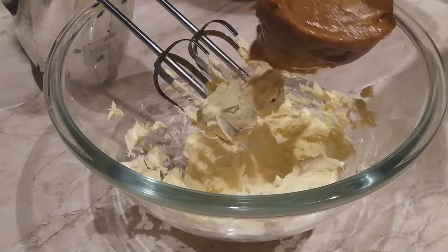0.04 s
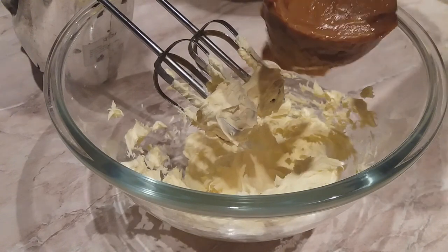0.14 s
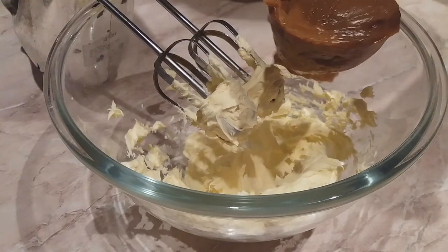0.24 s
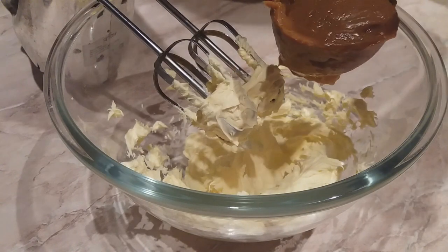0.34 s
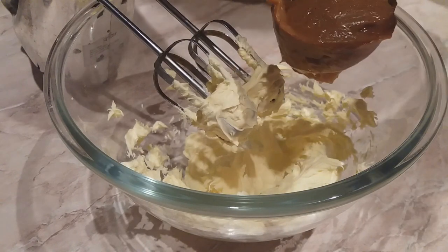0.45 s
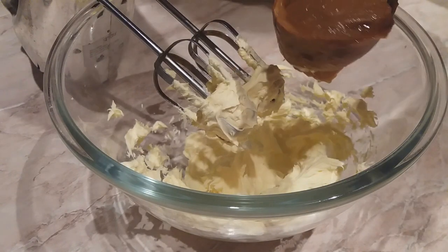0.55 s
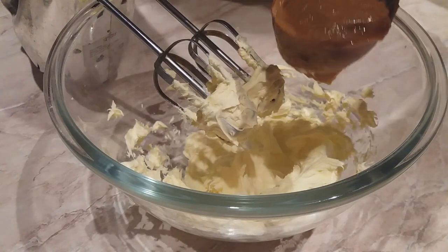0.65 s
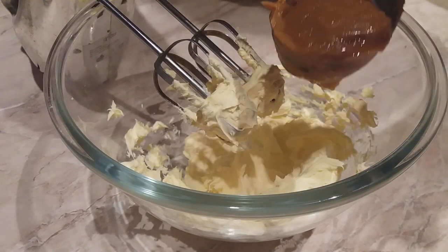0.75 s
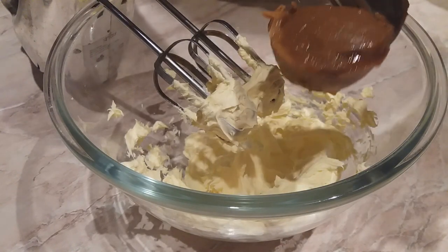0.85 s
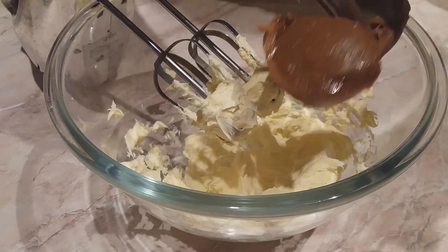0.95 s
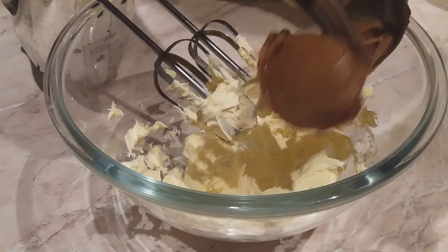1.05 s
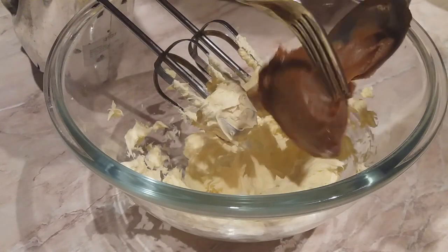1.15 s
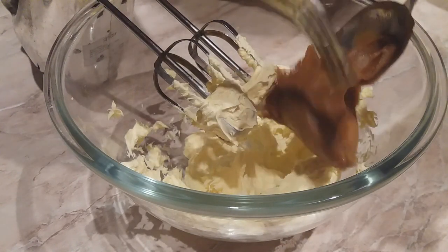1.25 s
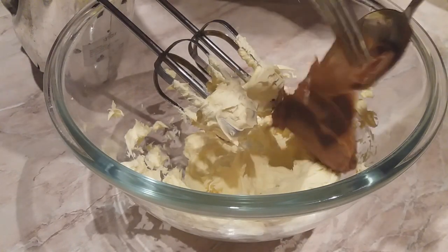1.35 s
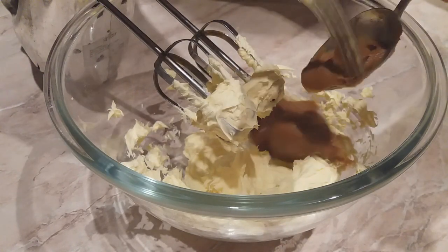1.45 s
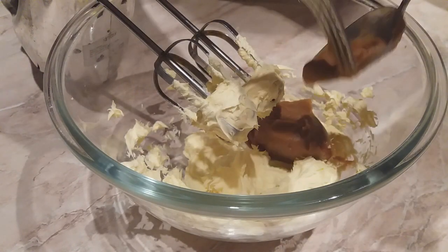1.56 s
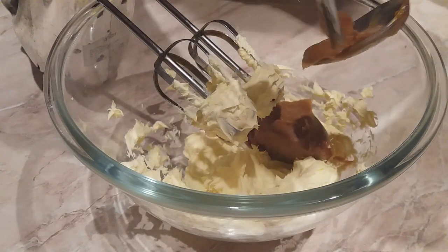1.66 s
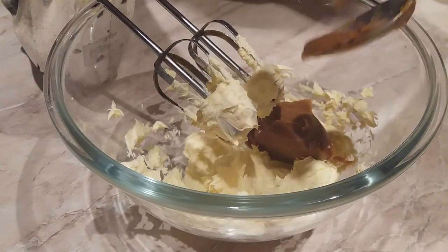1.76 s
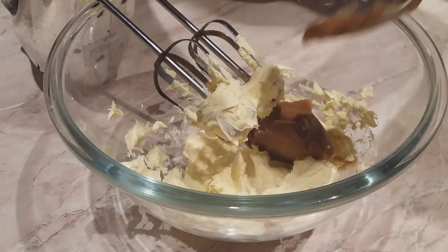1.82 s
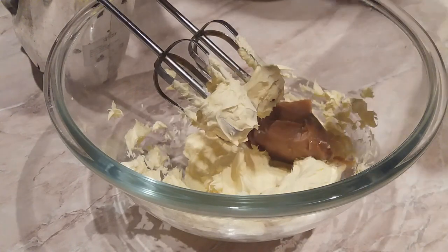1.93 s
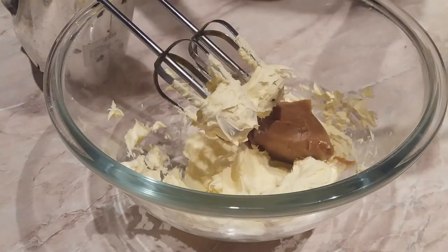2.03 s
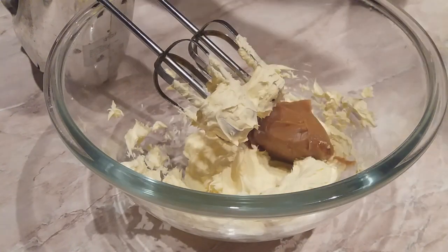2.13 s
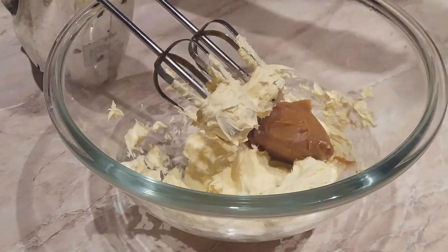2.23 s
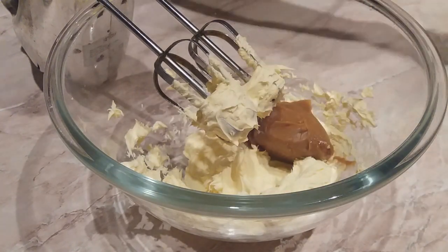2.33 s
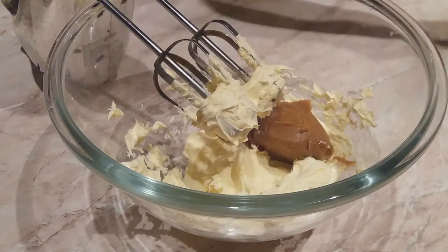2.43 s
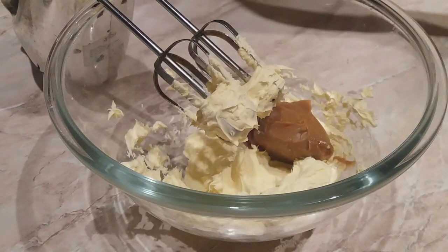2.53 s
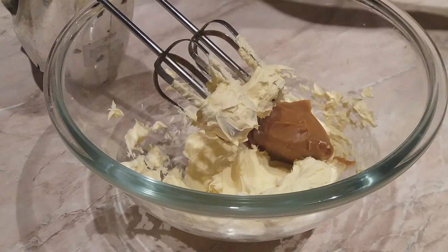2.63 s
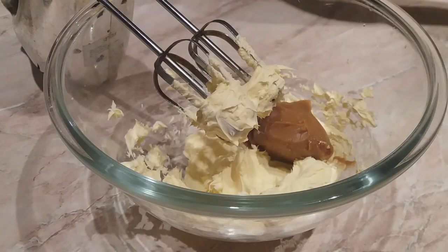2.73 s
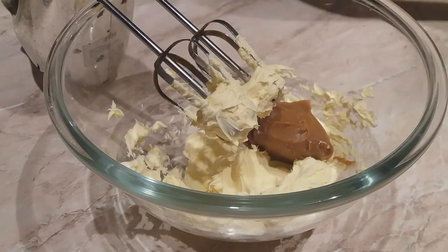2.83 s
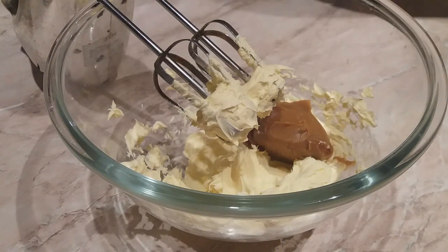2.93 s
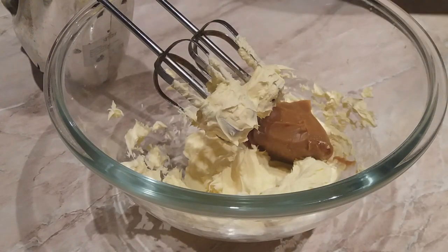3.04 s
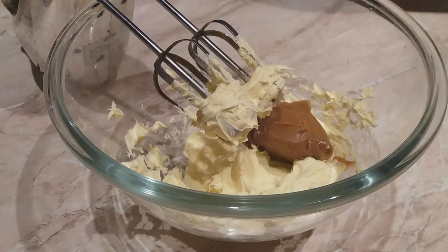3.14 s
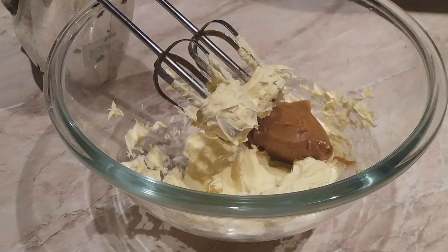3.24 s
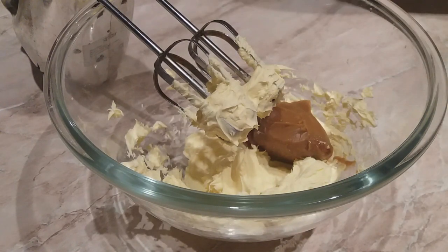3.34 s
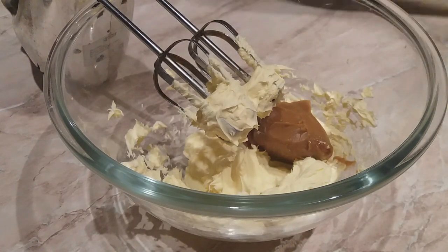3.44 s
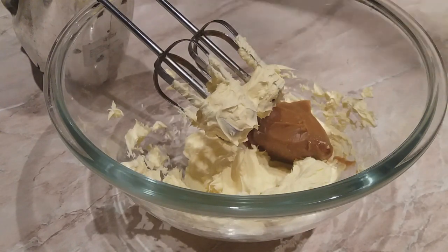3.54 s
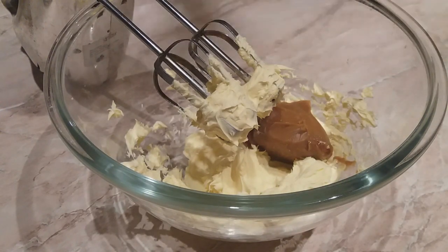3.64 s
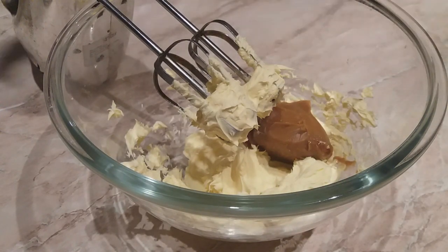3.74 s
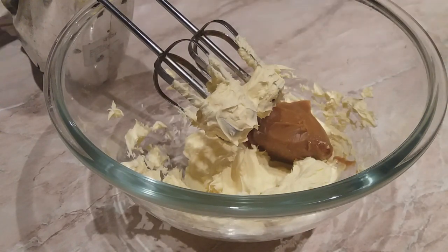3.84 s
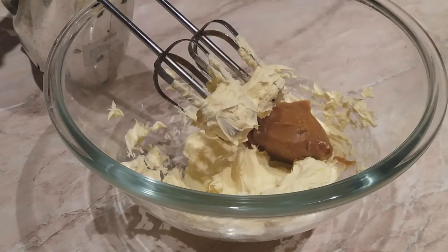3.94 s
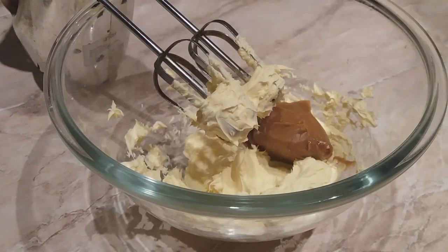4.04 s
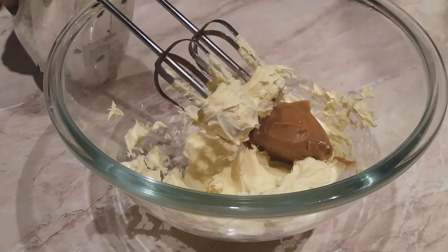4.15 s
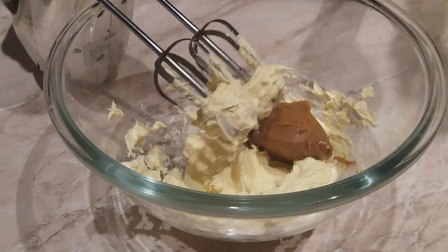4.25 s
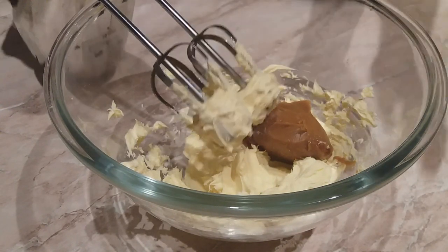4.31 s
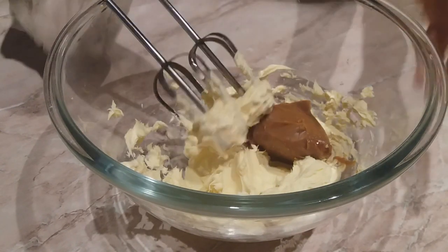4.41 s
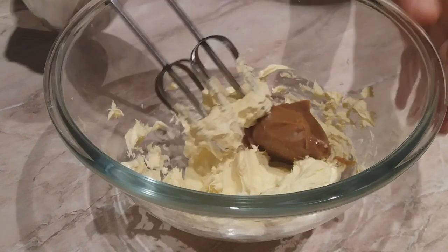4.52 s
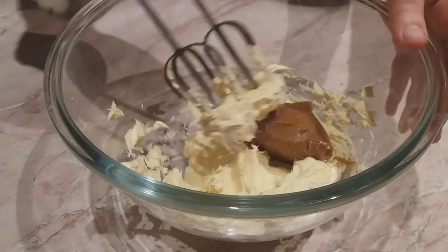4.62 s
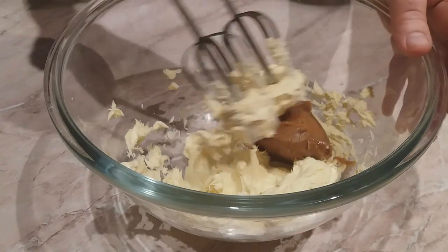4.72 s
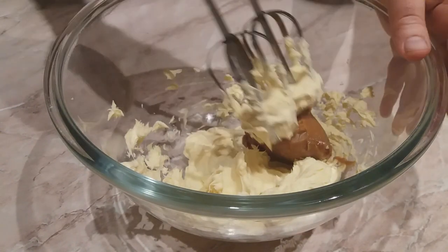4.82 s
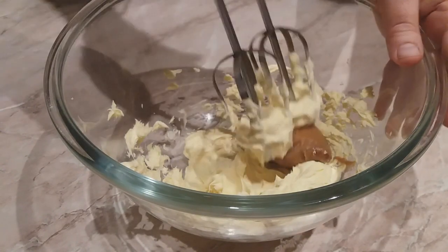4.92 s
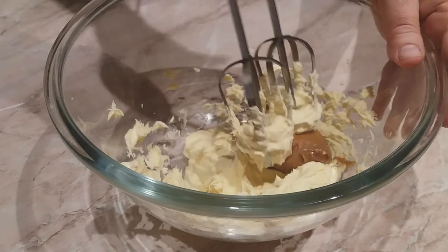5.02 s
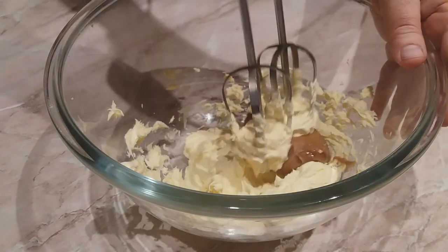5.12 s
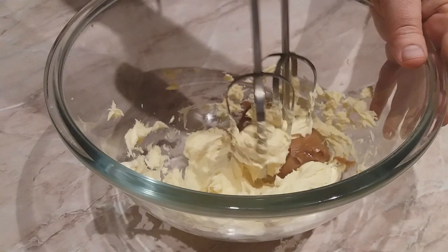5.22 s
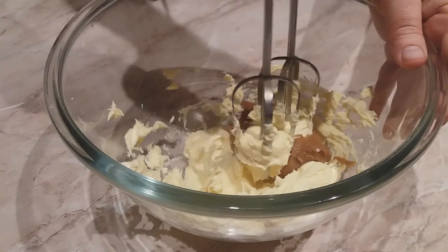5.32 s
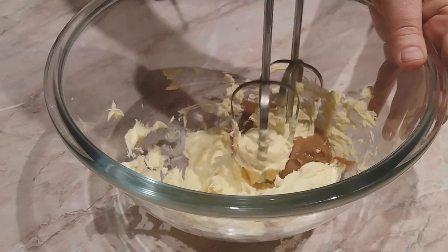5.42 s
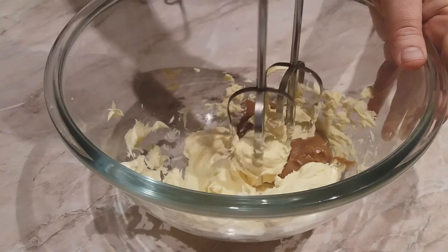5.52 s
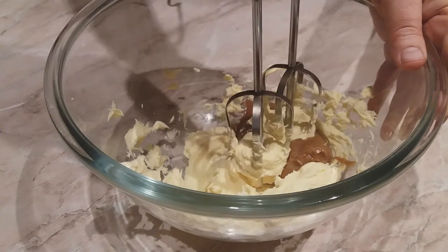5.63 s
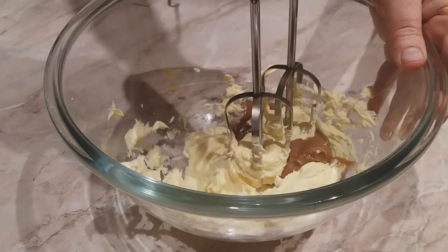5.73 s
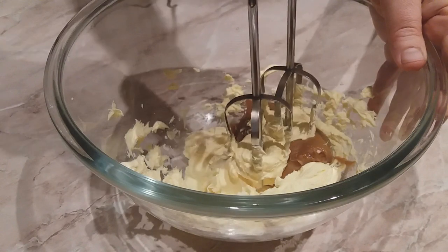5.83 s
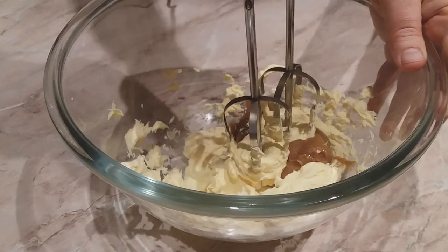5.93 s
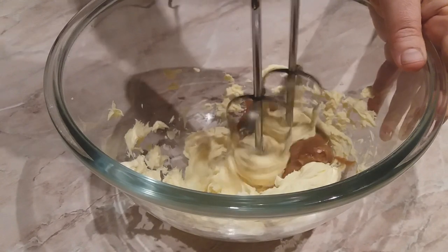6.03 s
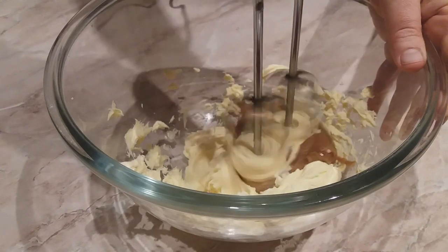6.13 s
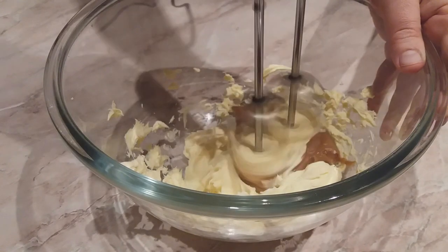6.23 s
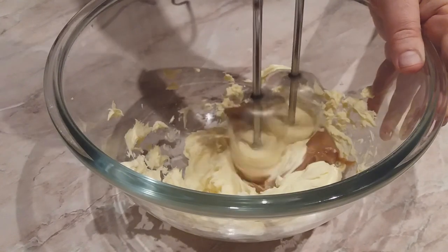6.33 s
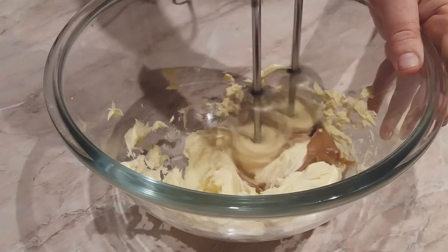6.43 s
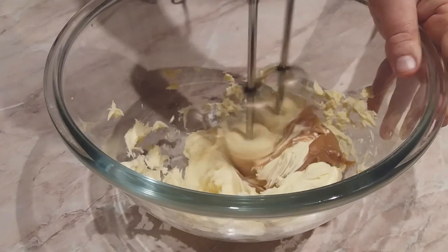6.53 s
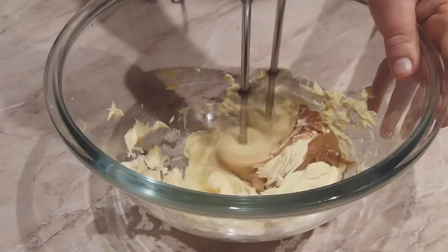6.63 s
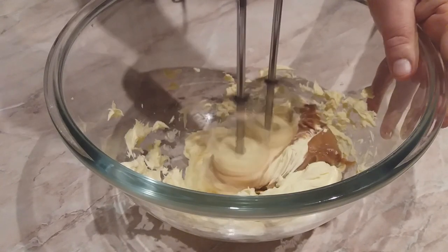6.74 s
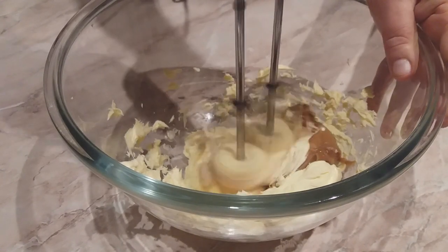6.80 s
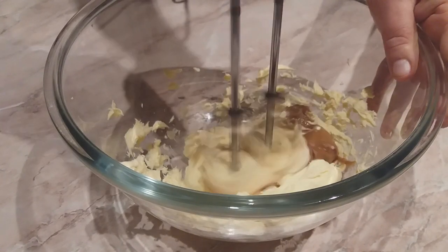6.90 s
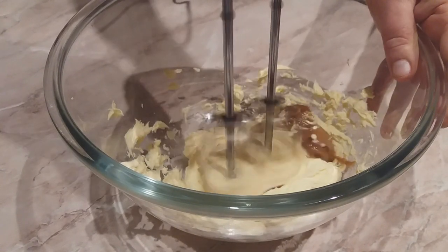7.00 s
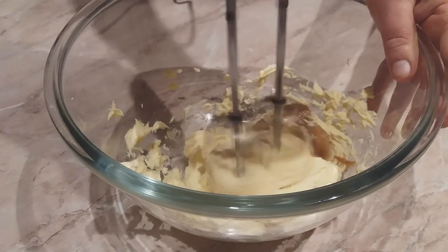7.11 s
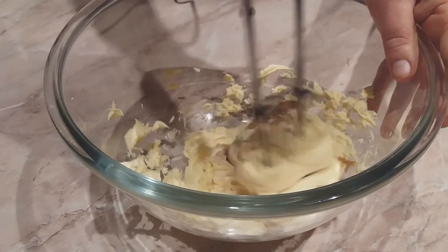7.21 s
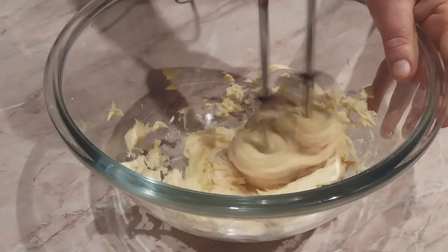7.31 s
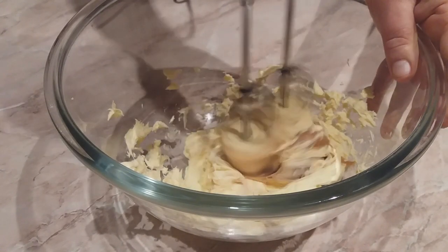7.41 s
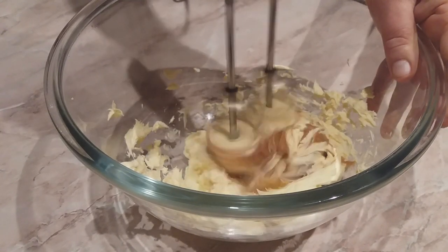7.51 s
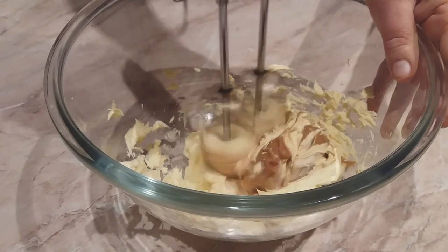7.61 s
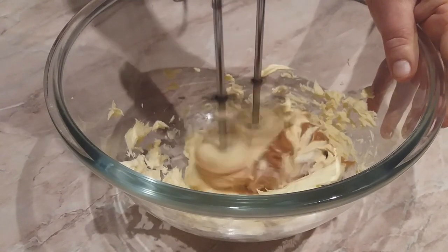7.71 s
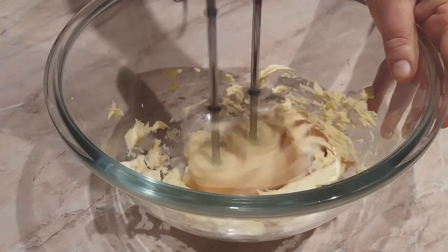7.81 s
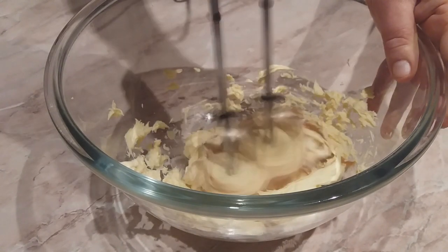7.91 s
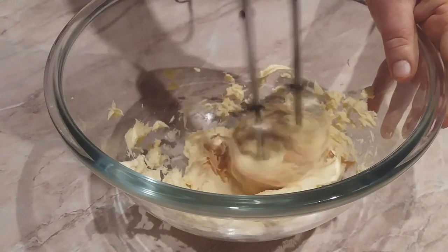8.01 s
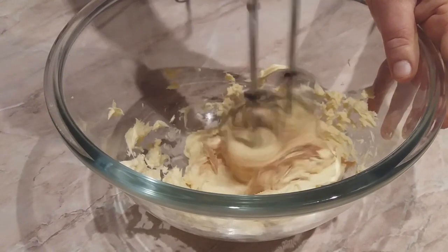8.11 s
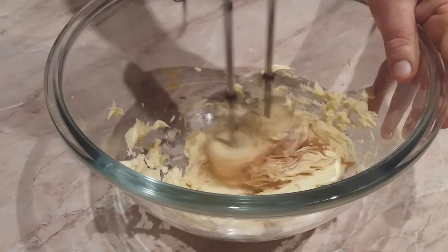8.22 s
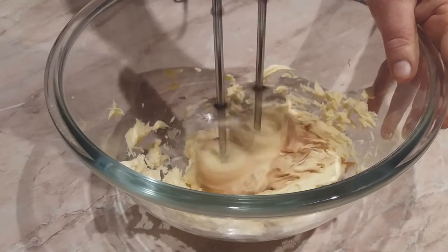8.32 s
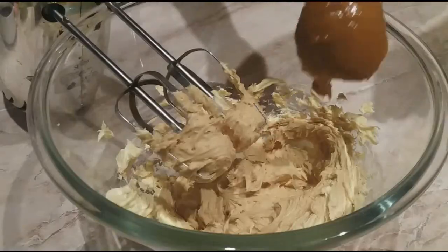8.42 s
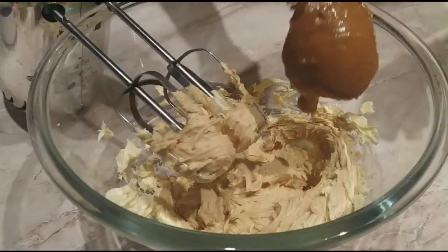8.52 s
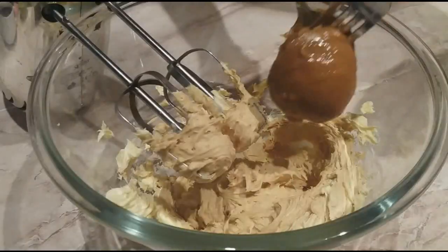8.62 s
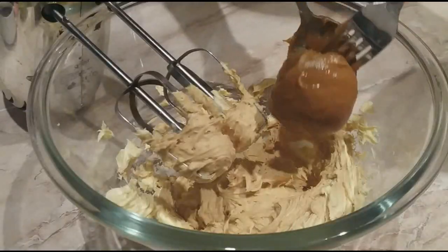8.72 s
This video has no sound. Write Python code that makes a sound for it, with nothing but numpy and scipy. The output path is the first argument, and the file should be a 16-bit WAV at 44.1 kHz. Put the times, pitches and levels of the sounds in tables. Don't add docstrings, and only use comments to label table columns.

```python
import sys
import numpy as np
from scipy import signal
from scipy.fft import rfft, irfft, next_fast_len
from scipy.io import wavfile
from scipy.ndimage import uniform_filter1d

SR = 44100
rng = np.random.default_rng(int(sys.argv[2]) if len(sys.argv) > 2 else 0)


def amplitude_ratio(level_db):
    exponent = np.asarray(level_db, float) / 20
    return 10 ** exponent


def dump(signal):
    limited = np.clip(np.atleast_2d(signal).T, -1, 1)
    pcm = np.round(limited * 32767).astype(np.int16)
    wavfile.write(sys.argv[1], SR, pcm)


N = 386316
T = np.arange(N) / SR
SLOTS, MAINS_PULL_HZ = 12, 100
MAINS_PHASE = 2 * np.pi * MAINS_PULL_HZ * T

# (frequency [Hz], width [Hz], level [dB])
STONE = [
    [(139, 230, -7), (239.4, 15, 2), (362, 54, -0.5), (490, 170, 1)],
    [(724, 150, -6), (1100, 120, 2), (1480, 240, -3), (1900, 800, 1), (3300, 460, -4)],
    [(3770, 400, 4.8), (8960, 690, 0.73), (9600, 2100, 0.6)],
]
# (start [s], length [s], housing level [dB], air level [dB])
JOLTS = [
    (6.149, 0.019, -27.5, -48),
    (6.172, .012, -30, -31.5),
    (6.19, 0.023, -20.5, -43.5),
    (6.233, 0.015, -33, -35),
    (6.29, 0.035, -43, -49),
    (6.573, 0.023, -59, -34),
    (7.345, 0.039, -30, -32),
    (8.113, 0.16, -51, -41.5),
]


def rms_one(x):
    return x / np.sqrt(np.mean(x ** 2) + 1e-20)


def in_time(rows, x, log=False):
    a, b = np.transpose(rows)
    return np.interp(np.log(x), np.log(a), b) if log else np.interp(x, a, b)


def drift(rate_hz):
    r = np.exp(-80 * np.pi * rate_hz / SR)
    noise = rng.standard_normal(N // 40 + 2002)
    slow = signal.lfilter([1], [1, -2 * r, r * r], noise)[2000:]
    return np.interp(np.arange(N) / 40, np.arange(len(slow)), rms_one(slow))


def coloured(spectrum):
    size = next_fast_len(N)
    hz, db = np.transpose(spectrum)
    bins_hz = np.arange(size // 2 + 1) * SR / size
    shape = amplitude_ratio(np.interp(np.log(bins_hz + 1), np.log(hz), db))
    return rms_one(irfft(rfft(rng.standard_normal(size)) * shape, size)[:N])


def resonate(x, body):
    out, power = 0, 0
    for k, (hz, width_hz, db) in enumerate(body):
        r = np.exp(-np.pi * width_hz / SR)
        a = [1, -2 * r * np.cos(2 * np.pi * hz / SR), r * r]
        mode = np.sqrt((1 - r * r) / 2) * signal.lfilter([1, 0, -1], a, x + 1e-18)
        out = out + (-1) ** k * amplitude_ratio(db) * mode
        power += amplitude_ratio(2 * db)
    return out / np.sqrt(power)


def grains(per_s, spread_db):
    sizes = amplitude_ratio(spread_db * np.minimum(rng.exponential(1, N), 4)) * rng.choice([-1, 1], N)
    return rms_one(sizes * (rng.random(N) < per_s / SR))


def spells(start_s, length_s, db, attack_s, t60_s, swell_db=None):
    out = np.zeros(N)
    for k, (s, length) in enumerate(zip(start_s, length_s)):
        t = T[:round((length + t60_s) * SR)][:N - round(s * SR)]
        swell = 0 if swell_db is None else swell_db[k] * (np.minimum(t / length, 1) - .5)
        release_db = 60 * np.maximum(t - length, 0) / t60_s
        out[round(s * SR):][:len(t)] += np.minimum(t / attack_s, 1) * amplitude_ratio(db[k] + swell - release_db)
    return out


def taps(events, body, crack_s, tail_db, trim_db, tilt):
    out, t = np.zeros(N), T[:SR // 2]
    for k, resonances in enumerate(body):
        force = np.zeros(N + len(t))
        for s, db, bright_db, t60_s in events:
            shape = np.exp(-t / crack_s) + amplitude_ratio(tail_db - 60 * t / np.clip(t60_s, .01, 1))
            force[round(s * SR):][:len(t)] += amplitude_ratio(db + trim_db[k] + tilt[k] * bright_db) * shape
        out += resonate(force[:N] * rng.choice([-1, 1], N), resonances)
    return out


def ring(modes):
    out, t = np.zeros(N + SR), T[:SR // 4]
    for s, hz, db, t60_s in modes:
        decay = amplitude_ratio(db - 60 * t / np.clip(t60_s, .008, .3))
        out[round(s * SR):][:len(t)] += decay * np.sin(2 * np.pi * hz * t)
    return out[:N]


def room():
    # (frequency [Hz], density [dB per Hz])
    room_tone = [(25, -25), (40, -21), (70, -1), (95, -5), (160, -3.5), (240, -2.5), (400, -10.5),
                 (1000, -14.5), (2500, -21.5), (5000, -29), (7000, -34.5), (10000, -30), (14000, -28),
                 (16000, -26)]
    return amplitude_ratio(-65.5 + 0.7 * drift(2.5)) * coloured(room_tone)


def rustle():
    # (start [s], length [s], level [dB], brightness [dB], swell [dB])
    brushes = [(1.427, 0.068, -70, -20, -13), (1.545, 0.087, -65.5, 23, 4), (4.49, 0.16, -65.5, -13, 5),
               (4.666, 0.18, -56.5, 20, -3), (4.914, 0.23, -63, 6, -12), (5.115, 0.26, -69.5, 21.5, -1),
               (5.38, 0.08, -67, 23.5, 3), (5.498, 0.2, -76, -14, -3), (6.017, 0.1, -57.5, -8, -14)]
    # (start [s], length [s], level [dB])
    shoves = [(1.436, 0.082, -61), (4.325, 0.06, -49.5), (4.524, 0.11, -53.5), (4.89, 0.13, -51),
              (5.214, 0.11, -55), (5.49, 0.13, -55.5), (6.048, 0.07, -56)]
    rumble = resonate(rng.standard_normal(N), [(84.5, 74, -6.0), (162.4, 125, 2.0)])
    dull = resonate(grains(6400, spread_db=3.0), [(1246, 1900, 9.4), (2910, 4200, 5.0)])
    bright = resonate(grains(8700, spread_db=0.0), [(5330, 14000, -0.79), (11380, 6700, -0.99)])
    s, length, db, bright_db, swell_db = np.transpose(brushes)
    out = spells(s, length, db, 0.015, 0.33, swell_db) * dull
    out += spells(s, length, db + bright_db - 24.0, 0.012, 0.16, 2.3 * swell_db) * bright
    squeak = resonate(rng.standard_normal(N), [(2060, 23, 0)])
    out += spells([4.553], [0.065], [-71], .01, .04) * squeak
    return out + spells(*np.transpose(shoves), 0.0098, 0.46) * amplitude_ratio(-6.0 + 1.9 * drift(10)) * rumble


def cutlery():
    # (time [s], level [dB], brightness [dB], t60 [s])
    contacts = [(0.558, -52, 6.5, 0.075), (0.57, -38, 5.5, 0.15), (0.625, -61.5, 2, 0.6),
                (0.671, -71, 12, 0.064), (1.0234, -72, -1, 0.06), (1.4381, -73, 8, 0.06),
                (1.5514, -50, 2, 0.14), (1.5565, -60, 6, .04), (1.5625, -54, 3, 0.046),
                (1.5894, -66, -2, 0.22), (1.6164, -51.5, 4, 0.1), (1.643, -63, 1, .1),
                (1.648, -61, -1, .06), (1.653, -62, 7, .06), (3.052, -54.5, 3.5, 0.18),
                (3.1443, -52.5, 2, 0.16)]
    # (frequency [Hz], width [Hz], level [dB])
    steel = [
        [(400, 200, 0)],
        [(1510, 1300, -14), (2260, 150, 6.5), (2510, 34, 7), (2930, 180, 8.5), (3070, 200, 12), (3670, 770, 11)],
        [(5200, 380, -10), (6050, 320, -4), (6300, 2000, 6), (6880, 1500, 8.5), (8040, 200, 2.5),
         (8730, 410, 2.5), (10700, 3500, 5), (12500, 580, 4), (13600, 500, -5.5), (14400, 2400, 3)],
    ]
    return taps(contacts, steel, crack_s=0.0011, tail_db=-15.5, trim_db=[-40, 8.0, 8.0], tilt=[0, -1, 1])


def contact_modes():
    # (time [s], frequency [Hz], level [dB], t60 [s])
    modes = [(.571, 2500, -61, 0.046), (.571, 3180, -54, 0.16), (1.552, 3500, -49, 0.036),
             (1.552, 7900, -46, .06), (1.563, 5220, -58, .04), (1.563, 3000, -58, .08),
             (1.59, 3500, -64, .04), (1.617, 7050, -45, 0.027), (1.652, 4100, -56, .03),
             (1.653, 2200, -62, .03), (2.899, 3900, -58, .03), (2.9, 1080, -54, .17),
             (2.993, 1690, -39, 0.042), (2.993, 2140, -46, .06), (3.053, 5120, -63, 0.046),
             (3.144, 5900, -58, .03), (3.144, 3120, -53, .04), (3.145, 3980, -60, .08),
             (3.145, 1540, -55, .05), (3.193, 1900, -53, .05), (3.193, 3950, -52, .03),
             (4.338, 900, -62, .04), (4.362, 794, -52, 0.062), (4.362, 1300, -61, .04),
             (4.538, 3230, -61, .05), (4.538, 3600, -62, .05), (4.681, 1700, -48, .05),
             (4.681, 2080, -53, .04), (5.4, 1900, -58, .04)]
    return ring(modes)


def scrape():
    # (frequency [Hz], width [Hz], level [dB])
    scraped = [(1222, 24, -5), (2100, 270, -1), (3250, 200, 3.5), (4370, 300, -2), (5230, 480, 5.5),
               (5840, 1200, 4.5), (8000, 2700, -3), (10400, 1100, 0.5), (14000, 1500, -10)]
    end_s, slip_t60_s = 1.09, .075
    ease_db = 230 * np.maximum(end_s - T, 0)
    db = -50 - ease_db - 60 * np.maximum(T - end_s, 0) / slip_t60_s
    clicks = (T > 1.022) * amplitude_ratio(db) * grains(2500, spread_db=2.5) * amplitude_ratio(0.78 * drift(120))
    return resonate(clicks, scraped[1:]) + resonate(clicks * amplitude_ratio(-5.5 - 0.75 * ease_db), scraped[:1])


def sticky_wipe():
    crackle = resonate(grains(1800, spread_db=1.5), [(1350, 500, 0)])
    return spells([1.446], [.055], [-67], .005, .08) * crackle


def laid_on_counter():
    # (time [s], level [dB], brightness [dB], t60 [s])
    spoon_down = [
        (2.899, -47, -3, 0.27),
    ]
    fork_down = [
        (2.734, -66, 12, 0.064),
        (2.993, -47, -1.5, 0.2),
        (3.036, -58, -9.5, 0.2),
        (3.143, -68, 17, 0.27),
        (3.187, -64, 7, .05),
        (3.193, -44.5, 1.5, 0.19),
    ]
    # (frequency [Hz], width [Hz], level [dB])
    spoon_on_stone = [(704, 140, -3.5), (1048, 40, 4.5), (1480, 92, -2), (1950, 55, -14), (1500, 610, -17),
                      (2700, 390, -13)]
    fork_on_stone = [(525, 76, 5), (1123, 54, 6.5), (1594, 120, 5), (2170, 320, 2.5), (1700, 1500, -0.5),
                     (2570, 130, -7.5), (3200, 300, -16)]
    tilt = [-1.3, 0, 1.6]
    spoon = taps(spoon_down, [STONE[0], spoon_on_stone, STONE[2]], crack_s=0.0012, tail_db=-5.0,
                 trim_db=[10.0, 9.0, -15], tilt=tilt)
    fork = taps(fork_down, [STONE[0], fork_on_stone, STONE[2]], crack_s=0.0011, tail_db=-4.5,
                trim_db=[11.0, 9.0, -15], tilt=tilt)
    return spoon + fork


def bowl_shifts():
    # (time [s], level [dB], brightness [dB], t60 [s])
    shifts = [(4.337, -70.5, 1.5, 0.13), (4.361, -72, 11, 0.08), (4.387, -77, -1, 0.085),
              (4.483, -71.5, 2, 0.079), (4.553, -72, -1, 0.88), (4.599, -87, 9, 0.27),
              (4.628, -69.5, 20, 0.4)]
    return taps(shifts, STONE, crack_s=0.0013, tail_db=-6.0, trim_db=[24, 7.0, -2.1], tilt=[-1.6, .3, .6])


def handle():
    # (time [s], level [dB], brightness [dB], t60 [s])
    clicks = [(4.679, -59, 6, 0.039), (4.919, -64.5, 0, 0.52), (4.994, -58, 1.5, 0.073),
              (5.091, -49, -0.5, 0.13), (5.228, -62, -13, 0.1), (5.279, -55, 3.5, 0.13),
              (5.399, -63, 3, 0.24), (5.5, -58, -5, 0.14), (5.642, -53, -2.5, 0.087),
              (5.731, -61.5, -5, 0.1), (5.831, -56.5, -1.5, 0.13), (5.943, -65, -4, 0.15),
              (6.018, -63, -2, 0.055), (6.027, -43, 4.5, 0.11), (6.066, -56, 1, 0.051),
              (6.12, -39.5, 4, 0.2), (6.157, -36, -5, 0.049)]
    # (frequency [Hz], width [Hz], level [dB])
    plastic = [
        [(233, 42, -6.5), (530, 244, 21)],
        [(703, 210, 2), (1186, 93, 12.6), (1900, 570, 10), (3420, 1400, 1.8)],
        [(4796, 1300, -1.5), (8400, 1300, -4.5), (12600, 5400, -2.5)],
    ]
    return taps(clicks, plastic, crack_s=0.0008, tail_db=-4.5, trim_db=[1.1, 6.0, -4.0], tilt=[-.9, 0, 2.2])


def bowl_rocking():
    # (time [s], peak [dB])
    thuds = [
        [(6.529, -20.5), (6.534, -17), (6.542, -23), (6.55, -9.5), (6.558, -13.5), (6.572, -9.5), (6.581, -15),
         (6.592, -7), (6.6, -16), (6.614, -15), (6.621, -18), (6.633, -22)],
        [(7.334, -31), (7.354, -6.5), (7.362, -28.5), (7.37, -4.5), (7.379, -15.5), (7.392, -7.5), (7.403, -8),
         (7.416, -11.5), (7.424, -16.5), (7.436, -22), (7.501, -19)],
        [(8.145, -9), (8.166, -5), (8.186, -4.5), (8.211, -12), (8.232, -16.5), (8.241, -16), (8.274, -21.5),
         (8.316, -18.5)],
    ]
    # (frequency [Hz], width [Hz], level [dB])
    rocking = [
        [(106, 45, -11), (231.4, 31, 3), (335, 113, 6.5), (445, 190, 5)],
        [(103, 45, -9), (232.3, 28, 5), (338, 78, 7.5), (453, 190, 5)],
        [(105.4, 42, -9.5), (245, 40, 6.5), (332, 110, 7.5), (450, 110, 3)],
    ]
    # (time [s], peak [dB])
    settles = [(4.339, -45), (4.387, -43), (4.395, -45), (4.481, -42), (4.54, -45), (4.559, -42),
               (4.571, -45), (4.6, -47), (4.632, -47)]
    # (frequency [Hz], width [Hz], level [dB])
    settling = [(150, 120, -0.5), (226, 26, 4), (330, 140, -3)]
    out = np.zeros(N)
    soft = np.hanning(round(0.0022 * SR))
    for events, body in zip(thuds + [settles], rocking + [settling]):
        push = np.zeros(N)
        for s, db in events:
            push[round((s - .001) * SR)] = -amplitude_ratio(db - 15.5)
        out += resonate(np.convolve(push, soft)[:N], body) * 60 / soft.sum()
    return out


def glass_clinks():
    # (time [s], peak [dB])
    clinks = [(6.1557, -48), (6.1758, -32), (6.186, -27), (6.197, -26), (6.208, -23.5), (6.241, -32),
              (6.499, -16.5), (6.5475, -21), (6.571, -18.5), (6.5916, -16), (7.329, -17.5), (7.352, -24),
              (7.368, -10.5), (7.3931, -13), (7.4155, -28), (8.143, -14.5), (8.1645, -8.5), (8.1862, -13)]
    # (frequency [Hz], level [dB], t60 [s])
    glass = [(1982, -13, 0.11), (2960, -16.5, 0.0235), (4700, -19, 0.04), (5750, -7, 0.023),
             (6450, -4, 0.015), (7370, -5.5, 0.043), (7960, 2.5, 0.0084), (8340, -6, 0.035),
             (9360, -4.5, 0.028), (10930, -5.5, 0.028), (11900, -1.5, 0.019), (13050, -17, .03),
             (14700, -8.5, 0.016)]
    out, t = np.zeros(N + SR), T[:SR // 8]
    for s, db in clinks:
        rings = 0
        for (hz, mode_db, t60_s), spread_db in zip(glass, rng.normal(0, 4.0, len(glass))):
            rings = rings + amplitude_ratio(mode_db + spread_db - 60 * t / t60_s) * np.sin(2 * np.pi * hz * t)
        crack = rng.standard_normal(len(t)) * np.exp(-t / 0.0036)
        out[round(s * SR):][:len(t)] += amplitude_ratio(db - 10.0) * (rings + crack)
    return out[:N]


def gear_slams():
    # (time [s], frequency [Hz], level [dB], t60 [s])
    slams = [(6.176, 2620, -30, 0.033), (6.176, 4500, -31.5, .02), (6.185, 6250, -29.5, .04),
             (6.186, 5300, -30, .03), (6.195, 3200, -25, 0.044), (6.195, 5350, -31, .04),
             (6.24, 4980, -28.5, 0.036), (6.24, 6300, -33, .02), (6.246, 1270, -20.5, 0.079),
             (6.248, 3900, -35, .02), (6.3, 5600, -34, .05)]
    return ring(slams)


def armature():
    # (time [s], speed [turns per s])
    run_up = [(6.142, 48), (6.222, 119), (6.29, 147), (6.35, 178.7), (6.44, 209.6), (6.53, 228),
              (6.64, 239.8), (6.79, 256.8), (7.0, 265.4), (7.3, 268.9), (7.44, 268.2), (7.62, 256.9),
              (7.75, 264.2), (7.95, 266.4), (8.1, 269.8), (8.22, 262.8), (8.32, 260.0), (8.4, 260.1)]
    inertia_s = .09
    speed = in_time(run_up, T)
    running = np.clip((T - run_up[0][0]) / 0.042, 1e-6, 1)
    speed = np.where(T > run_up[3][0], uniform_filter1d(speed, size=round(inertia_s * SR)), speed)
    speed = speed - 21 * np.exp(-((T - 6.246) / .015) ** 2)
    turn = 2 * np.pi * np.cumsum(speed * (1 + .0004 * drift(15) + .0008 * drift(3))) / SR
    strain = np.clip(1 - speed / 240, 0, 1)
    return speed, running, turn, strain


def shaft_hum(speed, turn):
    # (frequency [Hz], level [dB])
    hum_out = [(52, -62.5), (130, -73), (170, -58.5), (197, -49.5), (218, -39.5), (243, -55), (258, -43.5),
               (268, -39.5)]
    # (start [s], length [s], level [dB])
    loads = [
        (6.704, 0.23, -38),
        (7.423, 0.21, -41.5),
        (7.71, 0.084, -41),
        (8.268, 0.12, -40),
    ]
    hum_db = in_time(hum_out, speed, log=True)
    second = amplitude_ratio(-62.5) + spells(*np.transpose(loads), 0.027, 0.18)
    hum = amplitude_ratio(hum_db + 2.8 * drift(14.0)) * np.sin(turn)
    return hum + second * amplitude_ratio(1.4 * drift(30)) * np.sin(2 * turn)


def slot_whine(speed, turn):
    # (frequency [Hz], level [dB])
    whine_out = [(620, -27), (1150, -40), (1600, -42.5), (2000, -40), (2400, -35), (2650, -36.5),
                 (2900, -42), (3200, -45.5)]
    octave_out = [(1300, -58), (1900, -39), (2500, -40), (2900, -45), (3300, -47), (3700, -49), (4300, -58),
                  (5000, -66)]
    side_steps = [-3, -2, -1, 0, 1, 2]
    side_db = [-17.0, -11.0, -5.0, 0.0, -1.0, -6.0]
    full_speed_side_db = [-5, -1, 1, -4, 1, 0]
    slot_db = in_time(whine_out, SLOTS * speed, log=True)
    octave_db = in_time(octave_out, 2 * SLOTS * speed, log=True)
    waver_db = 1.5 * drift(12)
    spread = np.clip((262 - speed) / 25, .15, 1)
    vent_hz, vent_db_per_hz = 3050, .022
    out = np.zeros(N)
    for step, db, full_db in zip(side_steps, side_db, full_speed_side_db):
        off_hz = SLOTS * speed + step * MAINS_PULL_HZ - vent_hz
        shut_db = vent_db_per_hz * np.maximum(off_hz, 0) - 4.0 * np.exp(-(off_hz / 130) ** 2)
        line_db = slot_db + spread * db + (1 - spread) * full_db - shut_db
        flutter_db = waver_db + 2.5 * drift(7) + (1 + 2 * spread) * .8 * drift(45)
        phase = SLOTS * turn + step * (MAINS_PHASE + .9) + (1 - .5 * spread) * step ** 2
        out += amplitude_ratio(line_db + flutter_db) * np.sin(phase)
        octave_phase = 2 * SLOTS * turn + step * MAINS_PHASE + step ** 2
        out += amplitude_ratio(octave_db + 1.5 * db + 2.5 * drift(30)) * np.sin(octave_phase)
    return out


def brush_lines(speed, turn, strain, low):
    orders = [3, 7, 9, 11, 22, 13, 25, 26, 27, 29, 30, 31, 33, 34, 35, 36, 37, 38, 39, 40, 41, 42, 43, 44,
              45, 47, 48, 49, 52, 53, 54, 55, 56, 57, 59]
    orders_db = [-53, -54, -48, -48, -52, -53, -52, -54, -56, -53, -53, -54, -55, -56, -48.5, -45, -57, -55,
                 -54, -53, -50, -51, -52, -58, -58, -48, -45, -58, -53, -54, -51, -51, -56, -57, -56]
    # (frequency [Hz], level [dB])
    orders_out = [(7900, 0), (8600, -4), (9250, -1), (10000, -3), (12300, -2), (13300, -6), (14050, 3),
                  (14800, -3)]
    clear_db = -40 * strain - .3 * np.maximum(20 * np.log10(low) + 35, 0)
    out = np.zeros(N)
    for order, db in zip(orders, orders_db):
        line_db = db + clear_db + in_time(orders_out, order * speed)
        out += amplitude_ratio(line_db + 4.5 * drift(5) + 2.2 * drift(30)) * np.sin(order * turn + order ** 2)
    return out


def fan_air(speed, running, turn, strain):
    # (frequency [Hz], density [dB per Hz])
    airflow = [(30, -25.5), (100, -14.5), (400, -9.5), (560, -2), (900, -10), (1200, -6), (2900, -6.5),
               (3550, -9.5), (4100, -13.5), (4700, -11.5), (6300, -14.5), (8000, -10.5), (10300, -17),
               (12200, -12), (13400, -19), (14200, -16), (16000, -16.5)]
    s, length, _, air_db = np.transpose(JOLTS)
    steady_db = -30 + 7.5 * np.log2(speed / 285.5)
    blow = running * amplitude_ratio(steady_db) + spells(s, length, air_db, 0.013, 0.097)
    air = coloured(airflow)
    bass = signal.sosfilt(signal.butter(2, 450, fs=SR, output="sos"), air)
    air = air - strain * bass
    mains_db = (-1.0 + 5.2 * strain) * np.sin(MAINS_PHASE + 1.0)
    return blow * air * amplitude_ratio(mains_db + 1.9 * np.sin(turn) + 0.66 * drift(26))


def housing_shake(running, strain):
    # (frequency [Hz], width [Hz], level [dB])
    housing_modes = [(1147, 59, 4), (1187, 59, 0.5), (2590, 500, -10.5)]
    s, length, housing_db, _ = np.transpose(JOLTS)
    shake = running * amplitude_ratio(-37 + 1.2 * drift(8)) + spells(s, length, housing_db, 0.00614, 0.058)
    force = rng.standard_normal(N) * amplitude_ratio(5.0 * strain * np.sin(MAINS_PHASE))
    return shake * amplitude_ratio(-1.0) * resonate(force, housing_modes)


def squeal_levels(running):
    # (start [s], length [s], level [dB], low over high [dB], swell [dB])
    squeals = [(6.324, 0.27, -32.5, -3.5, -4), (6.654, 0.51, -32.5, -24, 5.5),
               (7.165, 0.13, -27.5, -6.5, -3), (7.305, 0.11, -24.5, -10.5, -4.5),
               (7.509, 0.15, -34.5, -32, 0), (7.652, 0.29, -31, 0.5, 5), (7.91, 0.11, -34.5, 9.5, 0),
               (8.03, 0.073, -31, 7.5, 5.5), (8.217, 0.016, -24, 4, -5), (8.246, 0.055, -27.5, 11, -1),
               (8.303, 0.088, -30, 9, -1.5)]
    s, length, db, low_over_db, swell_db = np.transpose(squeals)
    levels = []
    for level_db in (db + low_over_db, db):
        bursts = spells(s, length, level_db, 0.017, 0.076, swell_db)
        levels.append(running * amplitude_ratio(-68.5) + bursts * amplitude_ratio(.9 * drift(18)))
    return levels


def bearing_squeal(turn, strain, low, high):
    # (frequency [Hz], width [Hz], level [dB])
    low_modes = [(5070, 190, 1.5), (5200, 94, -2), (5390, 110, 0), (5470, 98, -1), (5616, 38, 0.5),
                 (5710, 80, -1)]
    high_modes = [(5990, 330, 3.5), (6480, 160, -5), (6393, 210, 4)]
    overtone = [(10570, 930, -5), (11410, 240, -2), (11790, 890, -3.5), (12420, 270, -17)]
    # (time [s], frequency [Hz])
    squeal_pitch = [(6.3, 5620), (7.3, 5600), (7.6, 5330), (7.9, 5330), (8.03, 5200), (8.112, 5320),
                    (8.23, 5350), (8.29, 5330), (8.33, 5230), (8.4, 5200)]
    mains_db = (3.0 + 10 * strain) * np.sin(MAINS_PHASE + 2.5)
    chatter = grains(9000, spread_db=.5) * amplitude_ratio(mains_db + 3.5 * np.sin(turn) + .8 * drift(30))
    centre_hz, reach_hz = in_time(squeal_pitch, T), 200
    favoured = np.zeros(N)
    for k, (hz, width_hz, db) in enumerate(low_modes):
        mode_db = db + 2.5 - 4.5 * ((hz - centre_hz) / reach_hz) ** 2
        favoured += (-1) ** k * amplitude_ratio(mode_db) * resonate(chatter, [(hz, width_hz, 0)])
    squeal = low * amplitude_ratio(-4.5) * favoured + high * amplitude_ratio(-4.0) * resonate(chatter, high_modes)
    squeal = signal.sosfilt(signal.butter(4, [4980, 6680], "band", fs=SR, output="sos"), squeal)
    return squeal + low ** 0.82 * amplitude_ratio(-13.5) * resonate(chatter, overtone)


def motor():
    speed, running, turn, strain = armature()
    low, high = squeal_levels(running)
    tones = shaft_hum(speed, turn) + slot_whine(speed, turn) + brush_lines(speed, turn, strain, low)
    noise = fan_air(speed, running, turn, strain) + housing_shake(running, strain)
    return np.sqrt(2) * running * tones + noise + bearing_squeal(turn, strain, low, high)


def scene():
    hands = room() + rustle() + bowl_shifts() + handle()
    table = cutlery() + contact_modes() + scrape() + sticky_wipe() + laid_on_counter()
    mixer = bowl_rocking() + glass_clinks() + gear_slams() + motor()
    return np.tile(hands + table + mixer, (2, 1))


def roll_off(x):
    return signal.sosfilt(signal.butter(12, 16500, fs=SR, output="sos"), x)


def record(dry):
    top_cut = signal.ellip(10, .5, 70, 15750, fs=SR, output="sos")
    wet = signal.sosfilt(top_cut, dry - .0005)
    stop_s, fade_s = 8.402, 0.0054
    return roll_off(wet * np.clip((stop_s - T) / fade_s, 0, 1))


dry = scene()
out = record(dry)
dump(out)
```